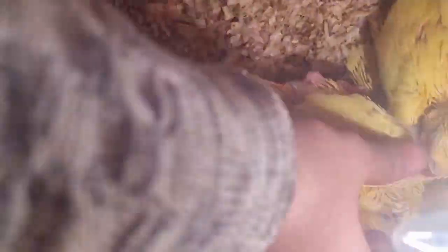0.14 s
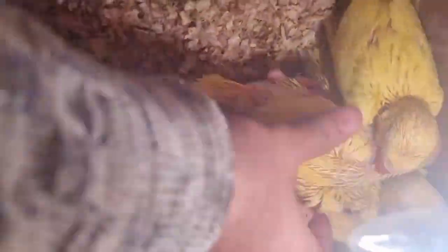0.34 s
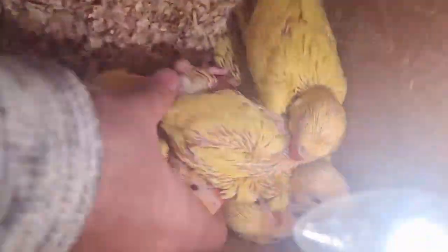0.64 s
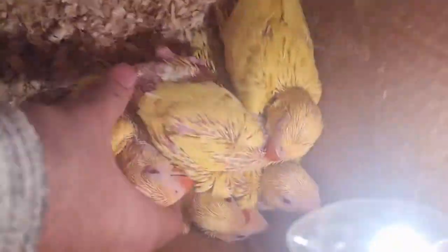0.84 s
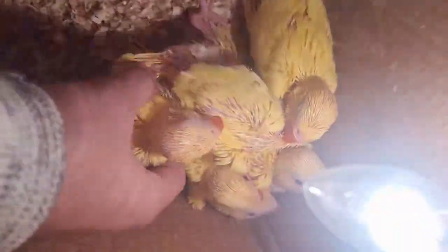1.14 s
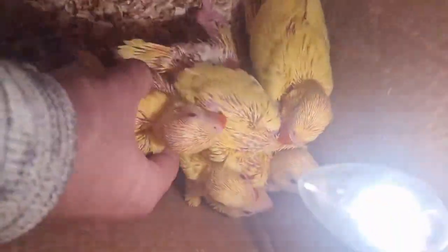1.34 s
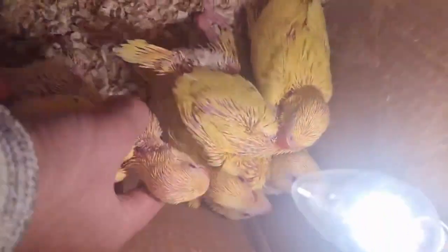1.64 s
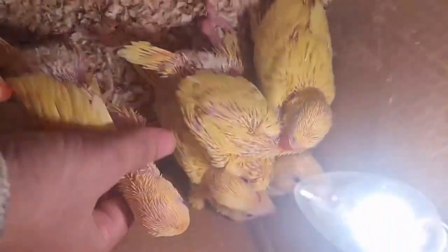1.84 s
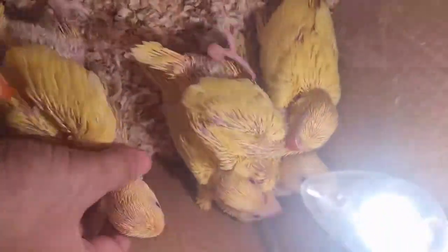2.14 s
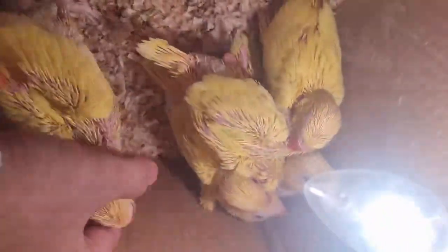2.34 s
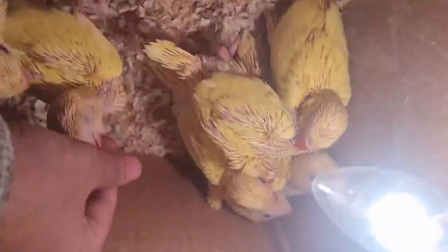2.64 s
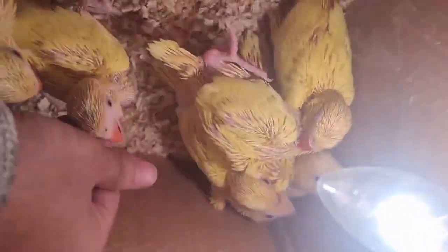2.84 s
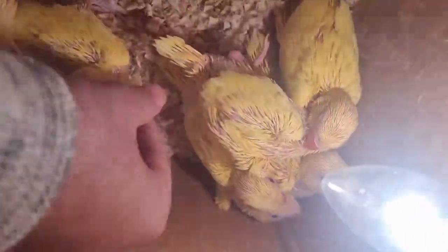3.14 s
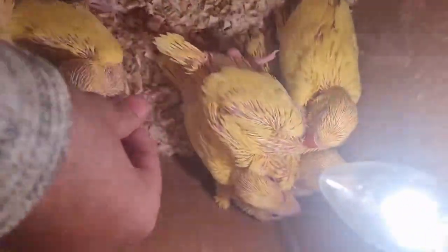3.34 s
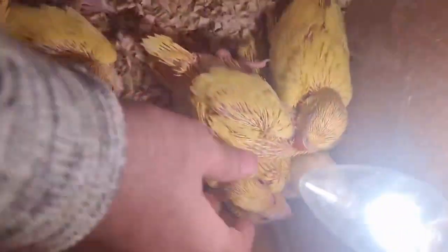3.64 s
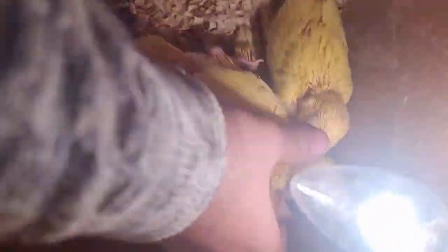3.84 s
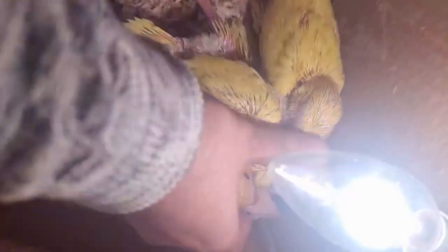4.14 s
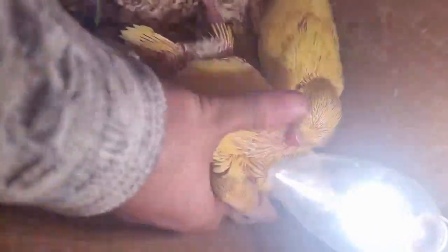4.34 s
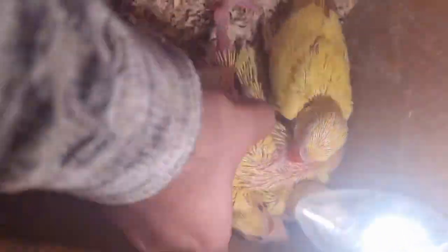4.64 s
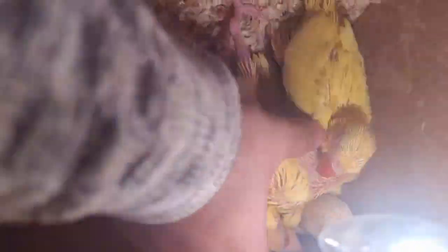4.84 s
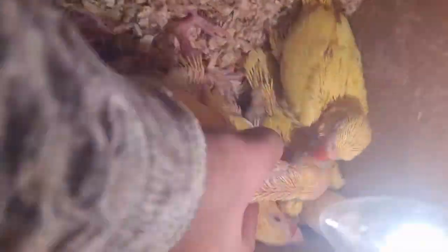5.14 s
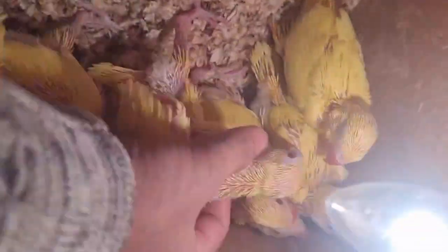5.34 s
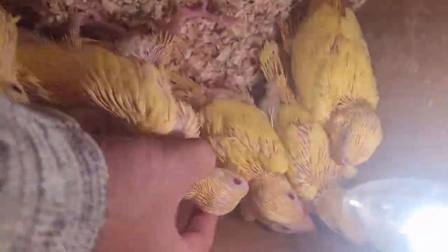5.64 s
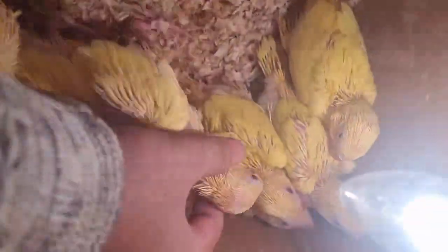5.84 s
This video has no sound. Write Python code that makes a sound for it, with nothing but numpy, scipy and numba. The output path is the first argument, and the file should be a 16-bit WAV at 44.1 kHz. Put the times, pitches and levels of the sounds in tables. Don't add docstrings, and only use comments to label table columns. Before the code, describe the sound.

Young parakeet chicks give raspy begging calls and short whistles in a wooden nest box while a handling hand bumps, clicks and rustles shavings.

```python
import sys
import numpy as np
from scipy import signal
from scipy.fft import rfft, irfft, next_fast_len
from scipy.io import wavfile
from scipy.ndimage import uniform_filter1d, map_coordinates
from numba import njit

SR = 44100
rng = np.random.default_rng(int(sys.argv[2]) if len(sys.argv) > 2 else 0)


def master(y):
    cut = np.clip(np.atleast_2d(y).T, -1, 1)
    pcm = np.round(cut * 32767)
    wavfile.write(sys.argv[1], SR, pcm.astype(np.int16))


def gain_from_db(level_db):
    decades = np.asarray(level_db, float) / 20
    return 10 ** decades


N = 264159
TIME = np.arange(N) / SR


def unit(x):
    return x / np.sqrt(np.mean(x ** 2))


def track(table, column):
    rows = np.array(table, float)
    return np.interp(TIME, rows[:, 0], rows[:, column])


def gate(table, rise_s, fall_s):
    start_s, end_s = table[0][0], table[-1][0]
    rise = (TIME - start_s) / rise_s + (start_s <= 0)
    fall = (end_s - TIME) / fall_s + 1
    return np.clip(np.minimum(rise, fall), 0, 1)


def colour(x, points):
    size = next_fast_len(len(x))
    hz, db = np.transpose(points)
    bin_hz = np.fft.rfftfreq(size, 1 / SR)
    gain = gain_from_db(np.interp(np.log(bin_hz + 1), np.log(hz), db))
    return irfft(rfft(x, size) * gain, size)[:len(x)]


def pan(x, db):
    return x * gain_from_db(np.array([db / 2, -db / 2]).reshape(2, -1))


def walk(rate_hz):
    hold = int(SR / rate_hz)
    steps = np.repeat(rng.standard_normal(N // hold + 1), hold)
    return 1.186 * uniform_filter1d(uniform_filter1d(steps, hold), hold)[:N]


@njit
def svf(x, hz, width):
    y, band, low = np.empty(len(x)), 0., 0.
    for i in range(len(x)):
        g, k = np.tan(np.pi * hz[i] / SR), width / hz[i]
        v = (band + g * (x[i] - low)) / (1 + g * (g + k))
        band, low, y[i] = 2 * v - band, low + 2 * g * v, k * v
    return y


# f/Hz, density/dB per Hz
ROOM_COLOUR = [(15, -58.5), (25, 1.5), (101, -4.5), (470, -21), (763, -21.5), (1210, -25), (1460, -25.5),
               (2120, -31), (2710, -30), (3180, -35), (5600, -35), (7130, -32.5), (7730, -41.5),
               (14400, -41.5), (15600, -63)]
# f/Hz, level/dB
HUM = [(48.4, -57), (96.9, -62.5), (145.3, -72.5), (199.2, -68.5), (247.6, -69.5)]
ROOM_DB = -53


def room():
    bands, swell_db = 0, walk(0.79)
    for hz in 30 * 2 ** np.arange(0, 9.2, .5):
        mid, side = (svf(rng.standard_normal(N), np.full(N, hz), hz / 3) for _ in range(2))
        share = np.interp(np.log(hz), np.log([130, 300, 700, 1500, 3000]), [0.24, 0.18, 2.16, 1.46, 0.97])
        flicker_db = np.interp(np.log(hz), np.log([60, 500]), [3.0, 1.2]) * walk(19)
        bands = bands + gain_from_db(swell_db + flicker_db) * (mid + share * side * np.array([[1], [-1]]))
    noise = gain_from_db(ROOM_DB) * unit(np.array([colour(port, ROOM_COLOUR) for port in bands]))
    hum = sum(np.sqrt(2) * gain_from_db(db + 2.1 * walk(1.3)) * np.sin(2 * np.pi * hz * TIME) for hz, db in HUM)
    return noise + hum


# peak t/s, peak level/dB, swell/s over 60 dB, t60/s
STROKES = [(0.03, -56, .5, .15), (0.655, -56, .04, .4), (0.749, -56, .1, .12), (0.88, -59, 2.5, .2),
           (0.913, -53, .1, .12), (0.949, -47, .06, .12), (0.97, -57, .05, .5), (1.585, -70, .03, 3.0),
           (2.1, -65, 4.0, .1), (3.0, -53, .04, .5), (3.162, -54, .03, .4), (3.208, -43, .1, .05),
           (3.226, -68, .05, .7), (4.34, -56, .04, .22), (4.604, -61, .3, .9), (4.71, -65, .9, .3),
           (4.884, -68.5, .9, .8), (5.104, -67, .3, 1.5), (5.16, -66, .9, .1), (5.75, -56, .17, .07),
           (5.868, -68, .3, 1.5)]
# f/Hz, density/dB per Hz
SHAVINGS_COLOUR = [(180, -50), (300, 7.5), (411, -7), (501, -7.5), (631, -1), (1280, -11.5), (1570, -9.5),
                   (3460, -14.5), (4430, -14.5), (6930, -21.5), (9970, -39.5), (14100, -25), (15600, -40.5)]


def rustle():
    power = 0
    for s, db, swell_s, t60_s in STROKES:
        power = power + gain_from_db(db - 60 * np.maximum((s - TIME) / swell_s, (TIME - s) / t60_s)) ** 2
    ports = []
    for _ in range(2):
        grains = (rng.random(N) < 900 / SR) * gain_from_db(6 + 2.35 * rng.exponential(size=N))
        ports.append(unit(colour((.5 + grains) * rng.standard_normal(N), SHAVINGS_COLOUR)))
    return gain_from_db(11.5) * np.sqrt(power) * np.array(ports)


# t/s, peak level/dB, ring f/Hz, t60/s
BUMPS = [(.228, -24, 100, 0.11), (.29, -23, 95, 0.041), (0.318, -29.5, 100, 0.13), (.882, -22, 86.7, 0.38),
         (0.919, -11.5, 80.4, 0.12), (0.947, -7.5, 93.5, .13), (0.999, -28, 63, 0.29),
         (3.17, -28, 92, 0.14), (3.206, -15, 58, 0.13), (3.78, -30, 87.5, 0.13), (4.39, -41, 70, .15),
         (4.68, -52, 70, .1), (4.892, -35, 59, .1), (5.385, -32.5, 72, 0.21), (5.454, -26.5, 99, 0.076),
         (5.511, -20.5, 81, 0.038), (5.665, -21.5, 85, 0.088)]


def bumps():
    out = np.zeros(N)
    for s, db, hz, t60_s in BUMPS:
        t = np.maximum(TIME - s, 0)
        push = 1 - np.exp(-t / 0.0058)
        out += gain_from_db(db - 60 * t / t60_s) * push * np.sin(2 * np.pi * hz * t)
    return pan(np.array([out, np.roll(out, 20)]), 3.3)


# t/s, peak level/dB, body below 2 kHz/dB, t60/s, left minus right/dB
CLICKS = [(0.6496, -40.5, 0.5, 0.022, -15), (0.7471, -40.5, 10.5, 0.042, 11), (0.834, -64, -29, 0.025, -3),
          (0.9118, -28.5, -3.5, 0.049, 3), (0.9479, -18.5, -3, 0.033, -10), (1.4614, -60, 6, 0.025, -0.5),
          (1.5816, -49.5, -3, 0.034, 0.0), (1.6727, -44, -6, 0.014, 0.5), (3.1597, -30, -12, 0.034, 5),
          (3.1663, -28.5, -11, 0.033, -1), (3.1766, -19.5, -13, 0.018, -3), (3.203, -30.5, 8.5, 0.058, -6),
          (3.2088, -38, 7, 0.064, 0.0), (3.2304, -60, 21, 0.08, -7), (3.2598, -66, 21, 0.07, -9),
          (4.6533, -38, -2.5, 0.013, 2.0), (4.6744, -54, -15, 0.025, 2.5), (4.7073, -37, -4.5, 0.035, -0.5),
          (5.0962, -45, -24, 0.028, 5), (5.438, -29, -1, 0.038, -6), (5.5211, -38, 9.5, 0.018, 6),
          (5.7465, -56, 4, 0.01, -8)]
# f/Hz, density/dB per Hz
CRACK_COLOUR = [(1000, -26), (1700, -15), (2080, -18), (2420, 3.5), (3050, -15), (3910, -7.5), (4580, -22),
                (7560, -18.5), (7990, -99), (13500, -26.5), (15600, -42)]
# f/Hz, width/Hz, level/dB
WOOD = [(513, 290, 8.5), (950, 150, -4.5), (1350, 100, -4)]


def clicks():
    length = 4096
    out, t = np.zeros((2, N + length)), TIME[:length]
    for s, db, body_db, t60_s, pan_db in CLICKS:
        common, *own = rng.standard_normal((3, length))
        shape = gain_from_db(-60 * t / max(t60_s, .003)) * np.minimum(t / 0.001, 1)
        crack = np.array([unit(colour(common + 0.69 * noise, CRACK_COLOUR)) * shape for noise in own])
        body = sum(gain_from_db(d) * svf(common * shape, np.full(length, 1. * f), 1. * w) for f, w, d in WOOD)
        body = gain_from_db(body_db) * body / np.abs(body).max()
        start = int(s * SR)
        out[:, start:start + length] += gain_from_db(db) * pan(.45 * crack + body, pan_db)
    return out[:, :N]


# delay/ms, gain
ECHO_LEFT = [(.9, -0.11), (1.5, -0.098), (2.6, -0.15), (3.9, 0.15)]
ECHO_RIGHT = [(1.199, 0.069), (2.098, 0.17), (3.102, -0.15), (4.599, -0.041)]


def box(x):
    out, t = [], TIME[:SR // 5]
    for echoes in (ECHO_LEFT, ECHO_RIGHT):
        answer = gain_from_db(-26.5) * rng.standard_normal(len(t)) * gain_from_db(-60 * t / .065) * (t > .003)
        answer[0] = 1
        for ms, gain in echoes:
            answer += gain * np.sinc(np.arange(len(t)) - ms * SR / 1000)
        out.append(signal.fftconvolve(x, answer / np.sqrt(np.sum(answer ** 2)))[:N])
    return np.array(out)


# t/s, f/Hz, fundamental level/dB
WHISTLES = [
    [(2.985, 770, -58), (3.003, 742, -30), (3.049, 646, -35.5), (3.101, 600, -40), (3.12, 520, -58)],
    [(4.195, 604, -36), (4.223, 607, -39), (4.299, 618, -44.5), (4.322, 586, -38)],
    [(4.326, 570, -45), (4.342, 550, -37), (4.366, 528, -43), (4.38, 507, -56)],
    [(5.174, 615, -32), (5.19, 698, -34.5), (5.228, 757, -33), (5.324, 754, -33), (5.37, 722, -35)],
    [(5.535, 677, -33), (5.551, 753, -36.5), (5.603, 842, -35), (5.671, 720, -34), (5.699, 667, -35.5),
     (5.745, 565, -61)],
]
# t/s, f/Hz, fundamental level/dB
CHIRPS = [
    [(-0.1, 830, -48), (0.044, 827, -49), (0.056, 796, -59)],
    [(1.95, 765, -51), (1.97, 890, -46), (2.0, 885, -47), (2.03, 940, -44.5), (2.112, 898, -47.5),
     (2.15, 906, -47)],
    [(2.075, 690, -47), (2.086, 680, -46)],
    [(3.272, 870, -57), (3.308, 735, -42), (3.332, 1040, -48), (3.35, 1010, -46), (3.372, 1110, -45),
     (3.386, 985, -50), (3.42, 985, -55), (3.455, 1015, -68)],
]
# f/Hz, level/dB re fundamental
OVERTONES = [(1050, 2), (1250, -2), (1450, -8), (1550, -13), (1750, -19), (1900, -17), (2120, -15),
             (2600, -20)]
OVERTONE_STEP_DB = -15
CHIRP_OVERTONE_DB, CHIRP_DULLS_DB_PER_S = 1, -90


def whistles():
    sound, power = np.zeros(N), np.zeros(N)
    shake = 1 + .017 * walk(120)
    throat_hz, throat_db = np.transpose(OVERTONES)
    for index, note in enumerate(WHISTLES + CHIRPS):
        chirp = index >= len(WHISTLES)
        chirp_db = CHIRP_OVERTONE_DB + CHIRP_DULLS_DB_PER_S * np.clip(TIME - note[0][0], 0, 1)
        pitch_hz, level_db = track(note, 1), track(note, 2)
        phase = 2 * np.pi * np.cumsum(pitch_hz * shake) / SR
        ramps = gate(note, 0.0038, 0.0069)
        for k in range(1, 7):
            over_db = 0
            if k > 1:
                passed_db = chirp_db if chirp else np.interp(np.log(k * pitch_hz), np.log(throat_hz), throat_db)
                over_db = passed_db + OVERTONE_STEP_DB * (k - 2)
            size = gain_from_db(level_db + over_db + (0.7 + .5 * k) * walk(90)) * ramps
            sound += np.sqrt(2) * size * np.sin(k * phase)
            power += size ** 2
    return sound, power


@njit
def slam(hz, uneven, chance):
    pulses, phase, p, k = np.zeros(len(hz) + 1), np.empty(len(hz)), .999, 0
    for i in range(len(hz)):
        step = hz[i] * np.exp(uneven[i] * chance[k, 0]) / SR
        p = p + step if step > 0 else .999
        if p >= 1:
            p, k = p - 1, k + 1
            size = np.exp(uneven[i] * chance[k, 1])
            pulses[i] += size * p / step
            pulses[i + 1] += size * (1 - p / step)
        phase[i] = p
    return pulses[:-1], phase


def throat(pulses, low_hz, high_hz, fill_db):
    middle_hz = (low_hz + high_hz) / 2
    out = svf(pulses, low_hz, 390.0) - gain_from_db(7.0) * svf(pulses, high_hz, 300.)
    out = out + gain_from_db(11.5 + 1.57 * fill_db) * svf(pulses, middle_hz, 210.0)
    hollow = np.clip((-8 - fill_db) * .036, 0, .9)
    out = out - hollow * svf(out, middle_hz, 330.0)
    return unit(colour(out, [(20, -22), (240, -8.5), (370, -5.5), (460, -17.5), (560, -3.5), (1600, -10),
                             (1720, -24), (3000, -43.5)]))


# f/Hz, width/Hz, level/dB
MOUTH = [(1900, 230, 2.5), (2582, 200, 0), (3410, 720, -2.5), (4510, 230, -1), (5370, 170, -6.5)]


def mouth(pulses):
    gape = 1 + .04 * walk(6)
    out = 0
    for hz, width, db in MOUTH:
        out = out + gain_from_db(db) * svf(svf(pulses, hz * gape, 1. * width), hz * gape, 1.9 * width)
    return unit(out)


# f/Hz, density/dB per Hz
BREATH_COLOUR = [(1000, -12.5), (1700, -5.5), (1920, 0), (2160, -10.5), (2560, -11), (3020, -9.5),
                 (3530, -6.5), (5410, -11.5), (7020, -17.5), (7920, -36.5), (8770, -25.5), (10400, -37.5),
                 (13100, -20.5), (14900, -38), (15600, -29)]


def breath(phase):
    puffs = (.5 + np.exp(-phase / .5)) * gain_from_db(2.0 * walk(40))
    common, *own = [unit(colour(puffs * noise, BREATH_COLOUR)) for noise in rng.standard_normal((3, N))]
    return gain_from_db(-7.0) * (common + 1.72 * np.array(own))


# t/s, effort as voice level/dB, membrane rate/Hz
CALLS = [
    [(0.057, -29, 345), (0.089, -28, 378), (0.25, -26.5, 425), (0.42, -25.5, 420), (0.46, -27, 315),
     (0.56, -28, 345), (0.6, -29.5, 290), (0.635, -28.5, 390), (0.645, -55, 395)],
    [(2.132, -40, 120), (2.185, -38, 140), (2.205, -35, 350), (2.44, -30, 305), (2.49, -28, 372),
     (2.616, -24.5, 405), (2.8, -27, 352), (2.94, -26.5, 340), (2.99, -32, 390)],
    [(3.476, -32, 395), (3.498, -27.5, 432), (3.53, -30, 350), (3.62, -29, 300), (3.78, -25.5, 315),
     (4.07, -32, 245), (4.185, -32, 280), (4.214, -37.5, 200), (4.335, -38.5, 150)],
    [(5.174, -38, 300), (5.19, -31.5, 295), (5.33, -36, 250), (5.4, -41, 140), (5.446, -36, 190),
     (5.484, -42.5, 185), (5.58, -36.5, 280), (5.688, -37, 260), (5.75, -54, 250)],
    [(5.928, -36, 175), (5.958, -28.5, 350), (5.99, -30, 360)],
]


def per_call(values):
    starts_s = [call[0][0] - .02 for call in CALLS[1:]]
    return np.asarray(values, float)[np.searchsorted(starts_s, TIME)]


# hiss/dB re voice, low throat f/Hz, high throat f/Hz, hiss fade/dB per s, throat gap level/dB
VOICE = [(-17.5, 870, 1400, -10, -4), (-9.5, 820, 1420, -9, -7), (-10.5, 850, 1400, -2, -6),
         (-12, 730, 1400, -10, -21), (-17, 800, 1470, 0, -2)]
UNEVEN = [.115, .11, .12, .15, .08]
LAG_MS = [.3, 0.1, .08, 0.088, 0.19]
# t/s, left minus right/dB
PLACE = [(0.06, -7), (0.6, -5.5), (2.2, -3.5), (2.6, -5.5), (3.0, -5), (3.5, -7.5), (3.75, -1.5),
         (4.1, -1.5), (4.25, -4), (5.2, -3), (5.45, -1), (5.6, -8), (5.75, -7), (5.95, -4)]
STEADY, SETTLE_S = .04, .06
LOW_HZ_PER_DB, HIGH_HZ_PER_DB = 16, 11
HISS_DB_PER_DB, FILL_DB_PER_DB = .55, .4
SAG_S = .09
BREATH_S = .14


def chicks():
    rows = sum(CALLS, [])
    on = sum(gate(call, .001, .009) for call in CALLS)
    whistle, whistle_power = whistles()
    effort_db, rate_hz = track(rows, 1), track(rows, 2)
    hiss_db, low_hz, high_hz, fade_db_per_s, fill_db = (per_call(column) for column in np.transpose(VOICE))
    full_db = per_call([max(row[1] for row in call) for call in CALLS])
    slack_db = np.maximum(effort_db - full_db, -15)
    age_s = TIME - per_call([call[0][0] for call in CALLS])
    sag = np.clip(age_s / SAG_S, 0, 1)
    low_hz = low_hz + LOW_HZ_PER_DB * slack_db * sag
    high_hz = high_hz + HIGH_HZ_PER_DB * slack_db * sag

    inside = 0
    for call in CALLS:
        edge_s = np.minimum(TIME - call[0][0], call[-1][0] - TIME)
        inside = inside + np.clip(edge_s / SETTLE_S - .5, 0, 1)
    uneven = STEADY + (per_call(UNEVEN) - STEADY) * inside
    wobble = np.exp(.55 * uneven * walk(110))
    chance = np.clip(rng.standard_normal((N // 50, 2)), -2, 2) * [.95, 1.5]
    pulses, phase = slam(rate_hz * wobble * (on > 0), uneven, chance)
    pulses = pulses / np.sqrt(rate_hz)
    pulses = pulses + 0.18 * np.roll(pulses, int(0.001377 * SR))

    total = gain_from_db(effort_db - .6) * on
    rasp_size = np.sqrt(np.maximum(total ** 2 - whistle_power, .12 * total ** 2))
    rasp = rasp_size * throat(pulses, low_hz, high_hz, fill_db + FILL_DB_PER_DB * slack_db)

    slow = lambda x: uniform_filter1d(x, size=int(BREATH_S * SR))
    breath_db = slow(slack_db * on) / np.maximum(slow(on), .01)
    bright = total * gain_from_db(hiss_db + HISS_DB_PER_DB * breath_db + fade_db_per_s * np.clip(age_s, 0, 1))
    voice = rasp + whistle + gain_from_db(-1.0) * bright * mouth(pulses)
    heard = pan(box(voice) + breath(phase) * bright, track(PLACE, 1))
    heard[0] = map_coordinates(heard[0], [np.arange(N) - per_call(LAG_MS) * SR / 1000], order=3)
    return heard


def scene():
    return room() + rustle() + bumps() + clicks() + chicks()


def roll_off(x):
    return signal.sosfilt(signal.butter(12, 15720, fs=SR, output="sos"), x)


def record(dry):
    ports = signal.sosfilt(signal.butter(2, 38, "high", fs=SR, output="sos"), dry)
    mix = np.array([colour(port, [(9300, -1), (10200, -6), (11000, 0.5)]) for port in ports])
    return roll_off(mix)


dry = scene()
out = record(dry)
master(out)
```